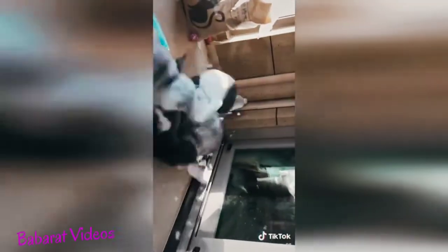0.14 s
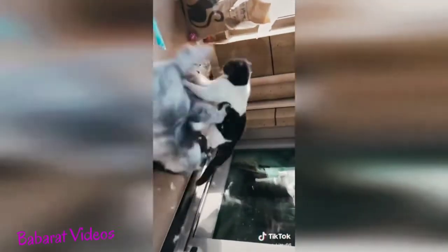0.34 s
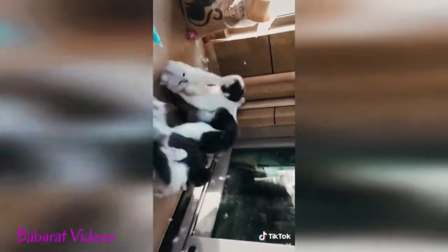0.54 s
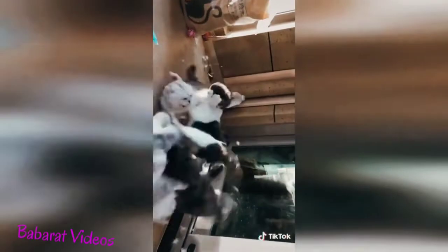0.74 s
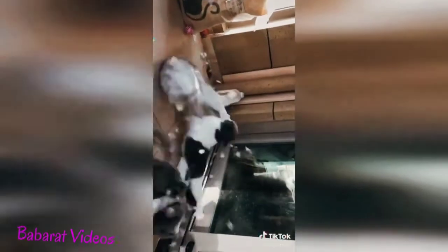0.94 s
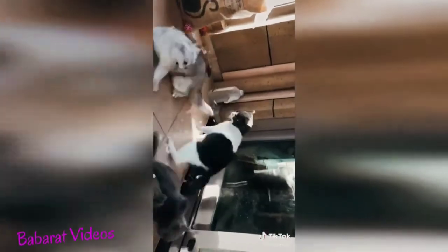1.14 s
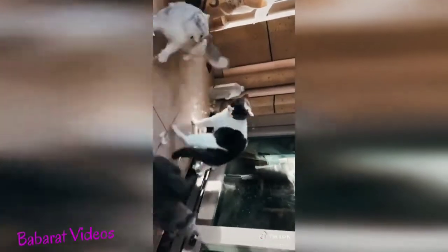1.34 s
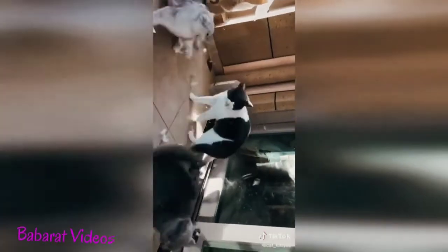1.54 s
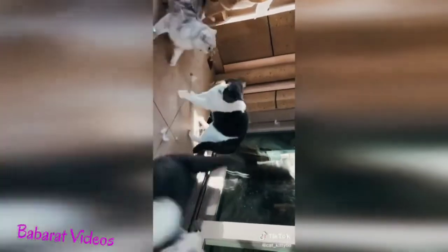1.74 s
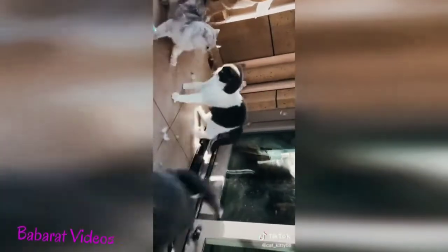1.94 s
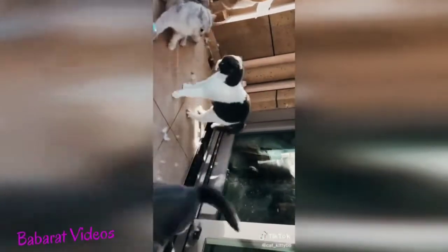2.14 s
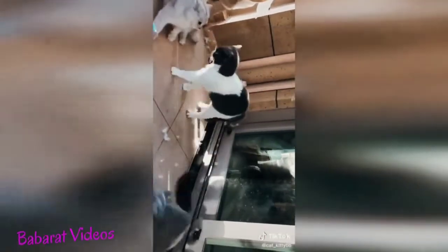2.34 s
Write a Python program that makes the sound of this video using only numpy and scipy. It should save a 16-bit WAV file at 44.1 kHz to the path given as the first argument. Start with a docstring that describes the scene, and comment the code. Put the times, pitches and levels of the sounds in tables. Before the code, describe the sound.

Cats fighting indoors, with a hoarse snarl, a spit and a long wavering scream.

```python
"""Cats fight on a tiled floor indoors, close to a phone. Claws scrape and bodies scuffle; a hoarse snarl
begins, then comes a short spit, then a long wavering scream that breaks upward, and last a few panting
rasps. Each call is a source-filter sound: vocal-fold pulses and breath shaped by throat and mouth.
Throughout, paws knock on the tile and the room answers briefly, over the low drone of the house."""
import sys
import numpy as np
from scipy import signal
from scipy.fft import rfft, irfft
from scipy.io import wavfile
from scipy.ndimage import uniform_filter1d, minimum_filter1d

SR = 44100
rng = np.random.default_rng(int(sys.argv[2]) if len(sys.argv) > 2 else 0)


def wrap_up_sound(samples):
    """Save the sound to the file named by the first command line argument, as 16-bit audio."""
    columns = np.atleast_2d(samples).T
    # keep every value between -1 and 1, then stretch to whole-number steps
    tamed = np.clip(columns, -1, 1)
    steps = np.round(tamed * 32767).astype(np.int16)
    wavfile.write(sys.argv[1], SR, steps)


N = 105840

# The calls: t/s, pitch f/Hz, level/dB, subharmonic level/dB, mouth opening (factor on throat frequencies)
SNARL = [(0.17, 376, -54, -18, 0.52), (0.232, 415.2, -16, -28, 0.93), (0.264, 398.3, -28.5, -10, 0.9),
         (0.31, 438, -30, -8, 0.73), (0.342, 418.4, -31, -16, 0.63), (0.356, 390, -21.5, -15, 0.5),
         (0.432, 411.8, -13, -34, 0.95), (0.474, 451, -12.5, 0.5, 0.93), (0.506, 432.9, -11, -34, 0.83),
         (0.522, 472.8, -10.5, -29, 0.81), (0.538, 470.2, -12.5, -24, 0.83), (0.58, 392.3, -18, -6, 0.98),
         (0.626, 407, -18, -1.5, 0.9), (0.664, 396.4, -22.5, -3, 0.83), (0.69, 355.2, -20, -2, 0.99),
         (0.744, 363.3, -25.5, -27, 0.93), (0.76, 327, -26, -21, 0.74), (0.82, 345, -56, -18, 0.9)]
SPIT = [(0.88, 434, -55, -7, 0.56), (0.9, 444.7, -28.5, -27, 0.93), (0.92, 483.2, -20.5, 2.5, 0.73),
        (0.96, 597, -14, -16, 1.14), (0.972, 569.4, -8, -24, 0.87), (0.984, 555.5, -17.5, -14, 0.77),
        (1.004, 600, -19.5, -12, 0.71), (1.07, 568.5, -50, -15, 1)]
SCREAM = [(1.16, 830, -50, -5, 1.2), (1.176, 826, -23, -9, 0.52), (1.218, 844, -26.5, 4, 0.49),
          (1.228, 812, -23, -10, 0.86), (1.25, 844.0, -19.5, 4.5, 0.87), (1.29, 821, -14.5, 0, 0.84),
          (1.314, 851.4, -10, 3, 0.98), (1.326, 853.5, -6, -3, 0.96), (1.396, 933.8, -9.5, -5.5, 1.2),
          (1.49, 915.7, -8.5, -6.5, 1.26), (1.522, 887.3, -5.5, -15, 0.94), (1.54, 863, -17, 3.5, 0.89),
          (1.572, 923.3, -4.5, -7.5, 1.2), (1.626, 868.7, -12, -9.5, 1.13), (1.682, 876, -13.5, -2.5, 0.96),
          (1.692, 873.7, -8.5, -12, 1.06), (1.744, 942.4, -3.5, -7, 0.97), (1.756, 963.0, -9.5, -6, 1.25),
          (1.766, 951, -6.5, -5, 0.89), (1.782, 1095, -15, 8, 1.5), (1.792, 1117, -8.5, -5, 0.95),
          (1.814, 1114, -15.5, -1, 1.8), (1.834, 1199, -5.5, 9.5, 1.1), (1.848, 1178, -4.5, 3, 1.28),
          (1.866, 1139, -6, -15, 1.04), (1.886, 1142, 0, -12, 1.2), (1.922, 1189, -6, 2, 1.13),
          (1.948, 1176, -7, 3, 1.3), (1.966, 1166, -15, 1, 0.96), (1.976, 1181, -1.5, -1, 0.9),
          (1.998, 1087, -11.5, -5, 1.3), (2.004, 1094, -12.5, -9, 1.35), (2.078, 907.6, -7.5, -10, 0.96),
          (2.122, 855.3, -24.5, 0, 0.82), (2.148, 895, -32, 1, 1.08), (2.16, 890, -29, 4, 0.82)]
RASPS = [(2.14, 604.3, -13.5, 22, 0.74), (2.158, 546.4, -29, -4, 0.95), (2.18, 574, -33.5, -6, 0.76),
         (2.224, 554.6, -18.5, -3, 0.92), (2.24, 591, -35, 18, 0.86), (2.268, 582, -29.5, -6, 0.76),
         (2.31, 583.4, -22, 12, 1), (2.372, 574.7, -32.5, -4, 0.98), (2.4, 604, -22, -2, 1)]
# Throat response in the hoarse calls and in the scream: f/Hz, level/dB
HOARSE_THROAT = [(150, -58.5), (420, 4.5), (650, -30), (900, 0), (1400, -2), (1900, 2), (2700, -2),
                 (3500, -13.5), (5000, -25.5), (7500, -26.5), (12000, -62.5), (16000, -23)]
SCREAM_THROAT = [(200, -52), (500, -32.5), (850, -12), (1250, -14), (1700, -3), (2500, -5.5), (3300, -10),
                 (4200, -18), (5500, -19), (6500, -32), (7700, -31), (9500, -34), (11000, -48),
                 (12500, -34), (14200, -37), (16000, -50)]
# Roughness of the voice: t/s, roughness (0 to 1)
ROUGHNESS = [(.17, .45), (.3, .55), (.4, .33), (.45, .4), (.55, .4), (.62, .65), (.9, .85), (.965, .3),
             (1.0, .7), (1.22, .9), (1.29, .25), (1.4, .03), (1.73, .02), (1.765, .5), (1.81, .4),
             (1.86, .25), (1.9, .08), (1.94, .22), (2.0, .32), (2.09, .4), (2.13, .9), (2.4, .8)]


def cat_call(rows, throat):
    """Source-filter principle: the glottis sets the pitch, the vocal tract the timbre."""
    times, *columns = np.transpose(rows)
    t = np.arange(times[0], times[-1], 1 / SR)
    hz, level_db, subharmonic_db, mouth = (np.interp(t, times, c) for c in columns)
    source = glottis(hz, subharmonic_db, curve(ROUGHNESS, t))
    voice = vocal_tract(source, t, mouth, throat)
    running_rms = np.sqrt(abs(uniform_filter1d(voice ** 2, size=1500)) + 1e-12)
    fades = signal.windows.tukey(len(t), 800 / len(t))
    return times[0], voice / running_rms * gain_of(level_db) * fades


# Weighting of the lines between the harmonics: f/pitch, level/dB
SUBHARMONICS = [(.5, -10), (1.5, -6), (2.5, 0), (3.5, -7), (4.5, 3), (8, -2.5)]
JITTER, JITTER_S, WAVER, WAVER_S = .055, .002995, .005, .007  # depth (share of pitch), time constant
FLUTTER_CYCLES, FLUTTER_S, SHIMMER_DB, SHIMMER_S = .012, .003, 4, .01


def glottis(hz, subharmonic_db, rough):
    """Period doubling: alternately strong and weak fold pulses add lines at odd multiples of half pitch."""
    n = len(hz)
    cycles = np.cumsum(hz * (1 + JITTER * rough * drift(n, JITTER_S) + WAVER * drift(n, WAVER_S))) / SR
    flutter = FLUTTER_CYCLES * drift(n, FLUTTER_S)
    folds = 0
    for k in range(1, 90):
        # each partial's phase flutters, the higher the more
        phase = np.pi * (k * (cycles + np.roll(flutter, 997 * k)) + 2 * rng.random())
        weight = gain_of(subharmonic_db + curve(SUBHARMONICS, k / 2)) if k % 2 else 1
        folds += weight * np.cos(phase) * (k * hz / 2 < BAND_LIMIT_HZ)
    shimmer = gain_of(SHIMMER_DB * np.sqrt(rough) * drift(n, SHIMMER_S))
    folds = folds * np.sqrt(hz / hz.mean()) * shimmer
    breath = (.12 + np.cos(np.pi * cycles) ** 2) * rng.standard_normal(n)  # one puff per cycle
    return np.sqrt(1 - rough ** 2) * unit_rms(folds) + rough * unit_rms(breath)


# Two sharp mouth resonances: t/s, f/Hz, level/dB
LOWER_FORMANT = [(.2, 1160, -36), (0.361, 750, 16.5), (.46, 1186, 12.5), (0.501, 1370, 10.5),
                 (.53, 1900, 11), (.62, 1660, 6), (.8, 1535, 23), (.92, 1630, 7), (.97, 1900, 2),
                 (1.05, 1750, 3), (1.25, 2280, 3), (1.331, 2570, 17.5), (1.42, 1930, 6.5), (1.72, 1885, 11),
                 (1.82, 2290, -2), (1.97, 2260, 6), (2.1, 1650, 9.5), (2.4, 1880, 16)]
UPPER_FORMANT = [(.2, 3130, 2), (.38, 1900, 1), (.43, 2030, 7.4), (.47, 2750, 1.4), (.7, 2890, 10.6),
                 (.92, 2580, 3.4), (.97, 2634, 14), (1.05, 2460, 4.6), (1.3, 3250, 13.2), (1.45, 3800, 2.7),
                 (1.7, 2920, 1.6), (1.85, 4200, 11.2), (2.05, 3850, 5.7), (2.3, 2547, 6.6)]
FORMANT_WIDTH, MOUTH_TOP_HZ = .1, 4500  # share of centre frequency; the mouth's effect fades above the top


def vocal_tract(source, t, mouth, throat):
    """Time-varying resonator: opening the mouth raises the throat's peaks; two formants glide on top."""
    f, frame_s, spectrum = signal.stft(source, SR, nperseg=512, noverlap=384)
    f, frame_s = f[:, None], frame_s + t[0]
    stretch = np.interp(frame_s, t, mouth) ** np.exp(-(f / MOUTH_TOP_HZ) ** 2)
    response_db = log_curve(throat, f / stretch)
    for formant in (LOWER_FORMANT, UPPER_FORMANT):
        times, centre_hz, boost_db = np.transpose(formant)
        detuning = (f / np.interp(frame_s, times, centre_hz) - 1) / FORMANT_WIDTH
        response_db += np.interp(frame_s, times, boost_db) * np.exp(-detuning ** 2)
    return signal.istft(spectrum * gain_of(response_db), SR, nperseg=512, noverlap=384)[1][:len(t)]


# Claws on tile and fur: t/s, onset level/dB, scrape level/dB (both as gains on the filtered noise)
SWIPES = [(0.0146, -17, -37), (0.242, -17, -33), (0.903, -40, -31), (0.9405, -19, -18.5),
          (1.0994, -36.5, -29), (1.7569, -18, -21.5), (2.2398, -19, -33)]
SWIPE_BAND_HZ, SWIPE_ONSET_S, SWIPE_T60_S = (3540, 9250), .007, .21


def claw_swipe(start, onset_db, scrape_db):
    """Friction noise: a bright burst falls away into a longer, exponentially decaying scrape."""
    t = np.arange(0, .25, 1 / SR)
    hiss = signal.lfilter(*signal.butter(1, SWIPE_BAND_HZ, "band", fs=SR), rng.standard_normal(len(t)))
    onset = gain_of(onset_db) * np.exp(-t / SWIPE_ONSET_S) / 2
    scrape = gain_of(scrape_db - 60 * t / SWIPE_T60_S)
    return start, hiss * (onset + scrape) * np.minimum(t / SWIPE_ONSET_S, 1)


# Paws on tile: t/s, level/dB (before the rise softens the peak), f/Hz
KNOCKS = [(0.029, -32, 332), (0.195, -12, 281), (0.249, -14.5, 210), (0.899, -23, 364), (1.101, -22, 300),
          (1.169, -37, 378), (1.229, -12.5, 617), (2.244, -16, 570)]
KNOCK_RISE_S, KNOCK_T60_S = .006, .063
SCUFF_HZ, SCUFF_DB, SCUFF_DECAY_S = 3000, -12, .015


def paw_knock(start, level_db, hz):
    """Damped oscillation: an impact excites one low mode, along with a dull scuff of noise."""
    t = np.arange(0, .2, 1 / SR)
    noise = signal.lfilter(*signal.butter(1, SCUFF_HZ, fs=SR), rng.standard_normal(len(t)))
    scuff = gain_of(SCUFF_DB) * noise * np.exp(-t / SCUFF_DECAY_S)
    mode = gain_of(-60 * t / KNOCK_T60_S) * np.sin(2 * np.pi * hz * t)
    return start, gain_of(level_db) * np.minimum(t / KNOCK_RISE_S, 1) * (mode + scuff)


# Bodies and paws: t/s, rumble level/dB, scrape level/dB (both relative to SCUFFLE_DB)
SCUFFLE = [(0.0, -39.5, -43), (0.01, -34, -37.5), (0.17, -22, -38.5), (0.25, -23, -27),
           (0.36, -20.5, -39.5), (0.39, -23.5, -31.5), (0.51, -47, -24), (0.55, -33, -23.5),
           (0.61, -32.5, -32), (0.68, -22.5, -26.5), (0.83, -39, -44), (0.92, -23.5, -30.5),
           (0.95, -58, -25), (1.06, -38, -40.5), (1.11, -25, -31.5), (1.16, -31, -38), (1.23, -19, -22.5),
           (1.32, -26, -19), (1.64, -38.5, -38.5), (1.83, -32, -22.5), (1.89, -33.5, -22),
           (2.04, -36.5, -29.5), (2.15, -39.5, -44), (2.26, -33, -24), (2.31, -36, -33.5),
           (2.4, -43.5, -45)]
# Spectral densities of rumble and scrape: f/Hz, relative level/dB
RUMBLE_SPECTRUM = [(76, -42), (130, -18), (291, 3), (941, -6.5), (1120, -3), (1250, -3.5), (1560, -8),
                   (2500, -28), (3250, -59), (5500, -120)]
SCRAPE_SPECTRUM = [(880, -37), (1500, -20), (1750, 2), (2780, -6), (2980, -6.5), (4120, -8), (6660, -14.5),
                   (12600, -18), (15600, -21)]
SCUFFLE_DB, PATCH_DB, FLICKER_DB = -3, 4, 1


def scuffle():
    """Modulated noise: bodies and paws make a low rumble and a flickering scrape, both patchy."""
    frames, hz = N // 128 + 5, np.fft.rfftfreq(512, 1 / SR)
    low_re, low_im, high_re, high_im, patches = rng.standard_normal((frames, 257, 5)).T
    patches = uniform_filter1d(patches, size=6, axis=0)  # smooth over frequency, then time
    patches = unit_rms(uniform_filter1d(patches, size=12, axis=1))
    flicker = gain_of(FLICKER_DB * rng.exponential(1, frames))
    times, rumble_db, scrape_db = np.transpose(SCUFFLE)
    rumble_shape = log_curve(RUMBLE_SPECTRUM, hz) - 60 * ((hz > 2500) | (hz < 130))
    scrape_shape = log_curve(SCRAPE_SPECTRUM, hz) - 60 * (hz < 1500)
    mix = 0
    for bins, shape_db, level_db in ((low_re + 1j * low_im, rumble_shape, rumble_db),
                                     ((high_re + 1j * high_im) * flicker, scrape_shape, scrape_db)):
        spectrum = bins * gain_of(shape_db[:, None] + PATCH_DB * patches)
        noise = signal.istft(spectrum, nperseg=512, noverlap=384)[1][:N]
        mix += unit_rms(noise) * gain_of(np.interp(np.arange(N) / SR, times, level_db + SCUFFLE_DB))
    return mix


# Reverberation time of the room: f/Hz, T60/s
ROOM_T60 = [(100, 0.55), (1000, 0.23), (4000, 0.18), (12000, 0.04)]
ROOM_DB = -7.5


def room(sound):
    """Reverberation: sparse reflections of random sign decay exponentially, each band at its own rate."""
    taps = np.zeros(SR // 2)
    slots = np.arange(120, len(taps) - 20, 20)
    taps[slots + rng.integers(0, 20, len(slots))] = rng.choice([-1., 1.], len(slots))
    hz, t, spectrum = signal.stft(taps, SR, nperseg=256)
    decay = gain_of(-60 * t / log_curve(ROOM_T60, hz)[:, None])
    tail = signal.istft(spectrum * decay, SR, nperseg=256)[1]
    return signal.fftconvolve(sound, tail / np.linalg.norm(tail))[:N]


# Spectral density of the drone: f/Hz, relative level/dB
DRONE_SPECTRUM = [(12, -57), (20, -33), (32, -39), (49, -5.5), (81, -5.5), (97, 7), (119, -8), (144, -9),
                  (200, 1.5), (260, -29), (440, -120)]
# Envelope of the drone: t/s, level/dB
DRONE_LEVEL = [(0.0, -43), (0.2, -43), (0.29, -34.5), (0.41, -42.5), (0.84, -45), (0.87, -33), (0.95, -49),
               (1.18, -37.5), (1.32, -45.5), (2.4, -50)]


def house_drone():
    """Band-limited noise: two spectral humps in the bass are heard as a hum."""
    hz = np.fft.rfftfreq(N, 1 / SR)
    shape = gain_of(log_curve(DRONE_SPECTRUM, hz)) * (hz < 200)
    noise = irfft(rfft(rng.standard_normal(N)) * shape, N)
    return unit_rms(noise) * gain_of(curve(DRONE_LEVEL, np.arange(N) / SR))


def drift(count, seconds):
    """Low-pass filtered noise: a random wander of rms 1."""
    pole = np.exp(-1 / (seconds * SR))
    return unit_rms(signal.lfilter([1], [1, -2 * pole, pole ** 2], rng.standard_normal(count)))


def gain_of(db):
    return 10 ** (np.asarray(db) / 20)


def unit_rms(x):
    return x / np.sqrt(np.mean(x ** 2) + 1e-20)


def curve(points, x):
    return np.interp(x, *np.transpose(points))


def log_curve(points, hz):
    f, value = np.transpose(points)
    return np.interp(np.log(hz + 1), np.log(f + 1), value)


def add(mix, start_s, sound):
    part = mix[round(start_s * SR):][:len(sound)]
    part += sound[:len(part)]


def scene():
    """Superposition: calls, claws and paws with their reverberation, plus scuffle and drone."""
    direct = np.zeros(N)
    for rows in (SNARL, SPIT, RASPS):
        add(direct, *cat_call(rows, HOARSE_THROAT))
    add(direct, *cat_call(SCREAM, SCREAM_THROAT))
    for row in SWIPES:
        add(direct, *claw_swipe(*row))
    for row in KNOCKS:
        add(direct, *paw_knock(*row))
    return (direct + gain_of(ROOM_DB) * room(direct) + scuffle() + house_drone())[None]


LIMIT_DB, RECOVERY_DB_PER_S, BAND_LIMIT_HZ = -.2, 150, 15750


def record(dry):
    """Filtering and limiting: the small microphone drops deep bass, peaks are held, top treble is cut."""
    x = signal.sosfilt(signal.butter(2, 45, "high", fs=SR, output="sos"), dry)
    recovery_db = np.arange(N) * RECOVERY_DB_PER_S / SR
    peak_db = 20 * np.log10(-minimum_filter1d(-abs(x[0]), size=129) + 1e-9)
    held_db = np.maximum.accumulate(peak_db + recovery_db) - recovery_db
    excess_db = np.maximum(held_db - LIMIT_DB, 0)
    limited = x / gain_of(uniform_filter1d(excess_db, size=65))
    lowpass = signal.firwin(1023, BAND_LIMIT_HZ, window=("kaiser", 10), fs=SR)
    return signal.oaconvolve(limited, lowpass[None], "same")


dry = scene()
out = record(dry)
wrap_up_sound(out)
```